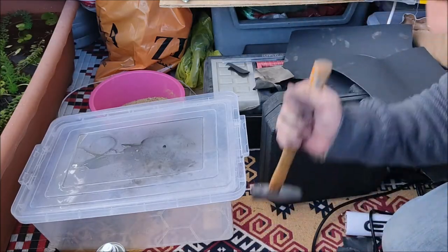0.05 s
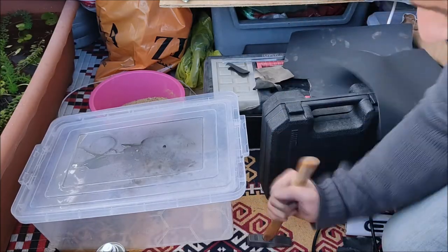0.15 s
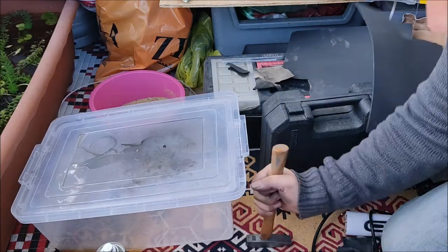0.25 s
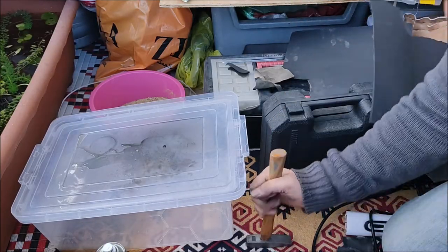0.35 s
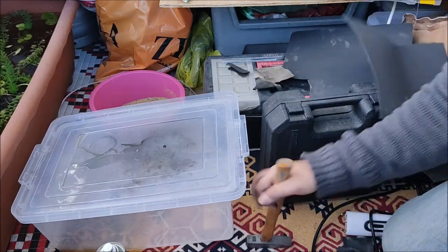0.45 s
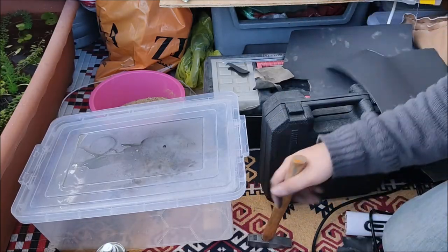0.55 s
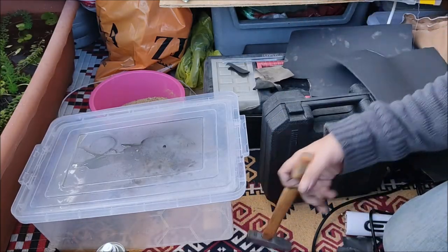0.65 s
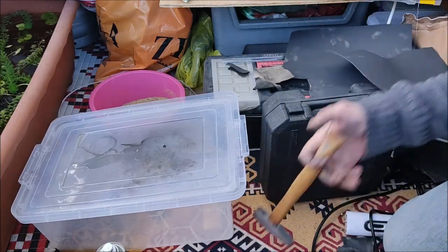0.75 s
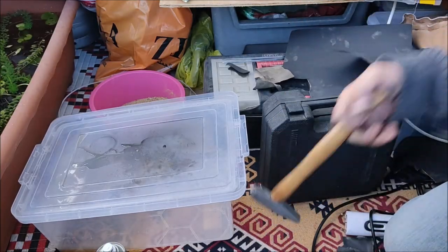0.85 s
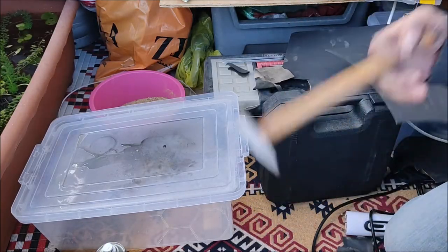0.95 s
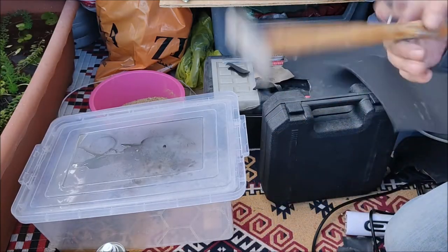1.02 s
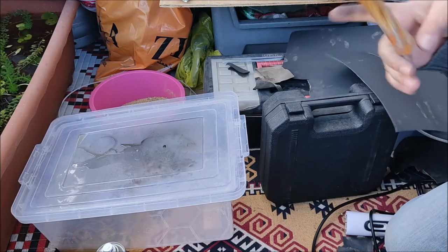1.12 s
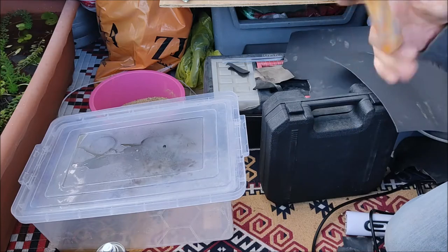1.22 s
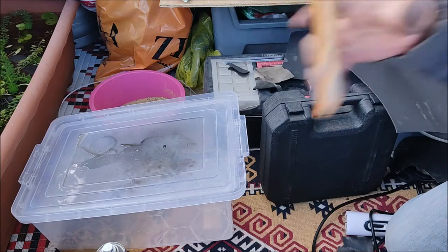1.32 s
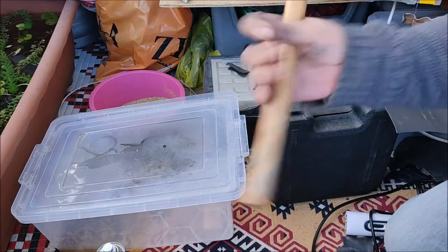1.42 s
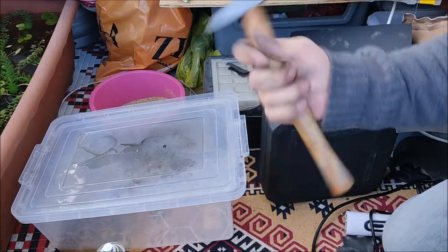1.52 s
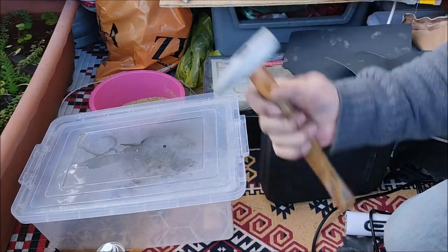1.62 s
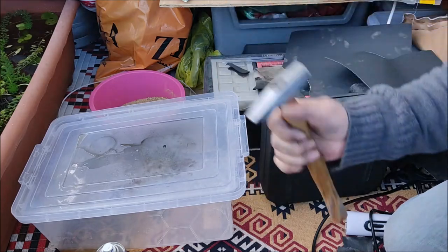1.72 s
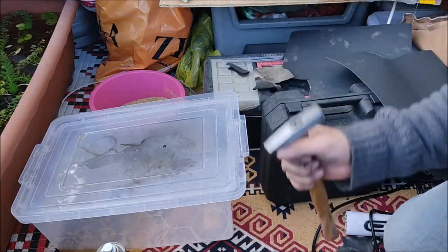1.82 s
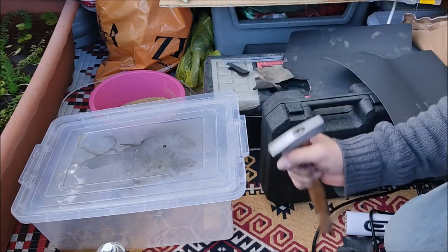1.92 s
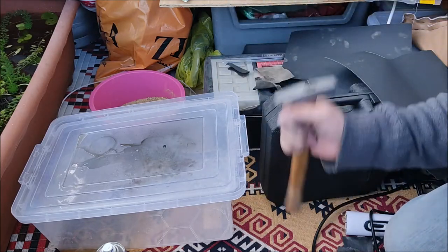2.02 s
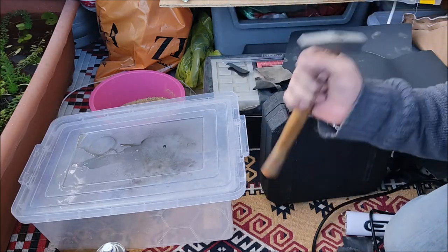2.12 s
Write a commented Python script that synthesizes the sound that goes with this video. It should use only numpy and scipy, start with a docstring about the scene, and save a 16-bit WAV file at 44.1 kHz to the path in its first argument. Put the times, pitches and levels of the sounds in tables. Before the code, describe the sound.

A small hammer hits the floor with one hard crack, followed by quiet handling.

```python
"""A small cluttered room with a rug on the floor. A small hammer is set down hard, then picked up,
tossed and caught by its handle. The blow cracks in the short modes of the head, bounces off near
surfaces and leaves the room ringing; the catch is a soft thud of handle and palm. Hand and sleeve
rub and rustle in patches of coloured noise, over quiet room tone and a low air rumble."""
import sys
import numpy as np
from scipy import signal
from scipy.io import wavfile

SR = 44100
rng = np.random.default_rng(int(sys.argv[2]) if len(sys.argv) > 2 else 0)


def generate_wav(signal):
    """Clip the signal to [-1, 1] and save it as 16-bit WAV at the path in sys.argv[1]."""
    frames = np.transpose(np.atleast_2d(signal))
    scaled = np.clip(frames, -1, 1) * 32767
    pcm = np.round(scaled).astype(np.int16)
    wavfile.write(sys.argv[1], SR, pcm)


N = 97020


def from_db(db):
    """Decibels to gain."""
    return 10 ** (np.asarray(db) / 20)


def unit_rms(x):
    """Scale to an rms of 1."""
    return x / np.sqrt(np.mean(x ** 2) + 1e-20)


def automation(rows):
    """One curve per column, ramping between the times in the first column."""
    times, *columns = np.transpose(rows)
    return [np.interp(np.arange(N) / SR, times, column) for column in columns]


def at_hz(points, hz):
    """Read a curve on a log-frequency axis."""
    freqs, values = np.transpose(points)
    return np.interp(np.log(hz), np.log(np.maximum(freqs, 1)), values)


def drift(rate_hz):
    """A smooth random wobble with a spread of 1."""
    hop, settle = 40, 2000
    pole = np.exp(-2 * np.pi * rate_hz * hop / SR)
    noise = rng.standard_normal(N // hop + settle + 2)
    slow = signal.lfilter([1], [1, -2 * pole, pole * pole], noise)[settle:]
    return np.interp(np.arange(N) / hop, np.arange(len(slow)), unit_rms(slow))


def ring(x, hz, t60):
    """One mode: a unit click sets off a dying sine of height 1."""
    decay, step = from_db(-60 / (t60 * SR)), 2 * np.pi * hz / SR
    return signal.lfilter([0, np.sin(step)], [1, -2 * decay * np.cos(step), decay * decay], x + 1e-18)


def resonate(noise, hz, width_hz):
    """Give noise a pitch by passing it twice through one resonance."""
    t60 = 2.2 / width_hz
    return ring(ring(noise, hz, t60), hz, t60)


# How alike the two channels are: freq_hz, correlation
STEREO_LIKENESS = [(40, 0.9), (130, 0.95), (300, 0.66), (700, 0.2), (1500, -0.2), (3000, 0.013),
                   (8000, 0.022)]
# Stereo balance: freq_hz, left_minus_right_db
STEREO_BALANCE = [(60, 15.5), (110, -2.5), (200, 6.5), (380, 4), (700, 4), (1290, 1), (2380, -0.5),
                  (4400, -3), (8120, -0.5), (15000, 1.5)]


def band_noise(spectrum, motion_db, size=N):
    """Stereo noise in third octaves, each with its own width, balance and level ride motion_db(hz)."""
    out, edges = 0, 35 * 2 ** np.arange(0, 9, 1 / 3)
    white = rng.standard_normal((2, 2, size))
    left_right = np.array([[1], [-1]])
    for k, (low, high) in enumerate(zip(edges, edges[1:])):
        hz = np.sqrt(low * high)
        if spectrum[0][0] <= hz <= spectrum[-1][0]:
            bandpass = signal.butter(2, [low, high], "band", fs=SR, output="sos")
            mid, side = signal.sosfilt(bandpass, white[k % 2])
            alike = np.clip(at_hz(STEREO_LIKENESS, hz), -1, 1)
            band = np.sqrt(1 + alike) * mid + np.sqrt(1 - alike) * side * left_right
            pan_db = at_hz(STEREO_BALANCE, hz) / 2 * left_right
            out = out + from_db(at_hz(spectrum, hz) + pan_db + motion_db(hz)) * band
    return out


# Colour of the room tone: freq_hz, density_db
ROOM_TONE_SPECTRUM = [(29, -42), (50, -7), (96, 0.5), (128, -18), (178, 2.5), (259, -6), (346, -9),
                      (397, -6), (762, -11.5), (920, -17.5), (1950, -29), (3000, -37.5), (3900, -55),
                      (6600, -120)]
# Its fader ride: time_s, gain_db
ROOM_TONE_RIDE = [(0, -4), (.8, -1.5), (1.3, -0.5), (1.6, 4), (2.2, 2)]


def room_tone(level_db=-53):
    """A quiet, dark bed of noise whose bands waver separately."""
    bed = unit_rms(band_noise(ROOM_TONE_SPECTRUM, lambda hz: 2.3 * drift(6.5)))
    return from_db(level_db + automation(ROOM_TONE_RIDE)[0]) * bed


# Fader ride of the air rumble: time_s, level_db
RUMBLE_RIDE = [(0, -56.5), (1.2, -58), (1.42, -46), (1.55, -48), (1.65, -44), (1.9, -41.5), (1.97, -50.5),
               (2.2, -41.5)]


def air_rumble():
    """Air on the microphone: a lumpy sub-bass, leaning left."""
    mid, side = rng.standard_normal((2, N + SR))
    air = mid + 0.17 * side * [[1], [-1]]
    rumble = unit_rms(resonate(air, hz=24.1, width_hz=3.34)[:, SR:])  # one second to settle
    return from_db(automation(RUMBLE_RIDE)[0] + [[2.5], [-2.5]]) * rumble


# Fader rides of the three rubbing layers: time_s, scrape_db, hiss_db, ring_db
RUB_RIDES = [(0, -45.5, -50, -71), (.04, -47, -52, -59), (.09, -52.5, -56.5, -79), (.115, -51.5, -47, -68),
             (.165, -51, -51, -75), (.195, -46.5, -42.5, -78), (.24, -46, -44.5, -99), (.44, -51, -59, -54),
             (.49, -44.5, -47.5, -54), (.557, -53.5, -58, -50.5), (.565, -50, -42, -51),
             (.61, -46, -55, -50), (.645, -42, -44, -98), (.75, -56, -57.5, -61), (.833, -51.5, -53.5, -59),
             (.845, -45.5, -49, -56), (.92, -45.5, -54.5, -50.5), (.99, -50.5, -58.5, -55.5),
             (1.06, -58.5, -60.5, -79), (1.08, -83, -45, -64), (1.11, -44.5, -40.5, -70),
             (1.2, -52.5, -50, -92), (1.29, -57, -60.5, -80), (1.325, -69, -61.5, -94),
             (1.395, -87, -60.5, -83), (1.42, -79.5, -50.5, -84), (1.49, -64, -45, -79),
             (1.525, -61, -38.5, -83), (1.58, -62, -47, -75), (1.62, -61, -35.5, -81),
             (1.7, -59, -56.5, -82), (1.77, -63.5, -49, -91), (1.83, -66, -52.5, -75),
             (1.9, -62, -50.5, -95), (2.2, -64.5, -54.5, -74)]
# Colour of the low scrape: freq_hz, density_db
SCRAPE_SPECTRUM = [(88, -115), (150, -10.5), (246, -10), (415, -19), (540, -15), (702, -12.5), (1800, -8.5),
                   (3610, -18.5), (6000, -18.5), (7800, -20), (13200, -120)]
# Colour of the bright hiss: freq_hz, density_db
HISS_SPECTRUM = [(1500, -36), (2000, -21), (2300, -11), (5000, -9.5), (6500, -7.5), (7800, 4.5), (9000, -6),
                 (10500, -16), (13000, 0), (15500, -30)]


def rubbing():
    """Hand and sleeve rub: a rough low scrape, a faint ring and a patchy bright hiss."""
    scrape_db, hiss_db, ring_db = automation(RUB_RIDES)
    scrape = unit_rms(band_noise(SCRAPE_SPECTRUM, lambda hz: drift(54)))
    tone = unit_rms(resonate(rng.standard_normal((2, N)), hz=1820, width_hz=90))
    hiss = unit_rms(band_noise(HISS_SPECTRUM, lambda hz: 1.6 * drift(2.2)))
    scrape *= from_db(scrape_db + 0.58 * drift(40))
    hiss *= from_db(hiss_db + 1.3 * drift(33))
    return scrape + from_db(ring_db) * tone + hiss


def strike(modes, scatter_db=0):
    """A click into modes of alternating polarity, with optional random scatter in their levels."""
    click = signal.unit_impulse(SR // 2)
    out = 0
    for k, (hz, db, t60) in enumerate(modes):
        if scatter_db:
            db += scatter_db * rng.standard_normal()
        out = out + (-1) ** k * from_db(db) * ring(click, hz, t60)
    return out


# Modes of the hammer head: pitch_hz, level_db, t60_s
HEAD_MODES = [(390, -11, .05), (1000, -3, .012), (1300, -1, .011), (1750, -1, .011), (3200, -4, .006),
              (4800, -2, .007), (7600, -16, .07), (13500, -7, .006)]


def head_crack():
    """The struck head rings very briefly: a hard crack, lows trimmed, peaking at 1."""
    crack = signal.lfilter(*signal.butter(2, 250, "high", fs=SR), strike(HEAD_MODES))
    return crack / np.abs(crack).max()


def contact_snap(centre_hz, t60=.009):
    """First contact spits out a tiny burst of band-passed noise."""
    t = np.arange(SR // 10) / SR
    burst = rng.standard_normal((2, len(t))) * from_db(-60 * t / t60)
    band_hz = [centre_hz / 2, min(2 * centre_hz, .45 * SR)]
    return signal.lfilter(*signal.butter(1, band_hz, "band", fs=SR), burst)


# Modes of handle and palm: pitch_hz, level_db, t60_s
HANDLE_MODES = [(185, -6, .19), (260, -4, .33), (352, 0, .22), (378, -4, .18), (427, -2, .18), (535, 1, .2),
                (738, -8, .2), (916, -12, .15), (1217, -9, .05)]


def handle_thud():
    """Handle and palm give a muffled knock, coloured a little differently each time."""
    return -signal.lfilter(*signal.butter(1, 1500, fs=SR), strike(HANDLE_MODES, scatter_db=2))


# Colour of the diffuse reverb: freq_hz, density_db
REVERB_SPECTRUM = [(24, -59), (40, -46), (81, -17), (150, -30), (197, -15.5), (298, -7.5), (391, -4),
                   (499, -14), (670, -0.5), (945, -2.5), (1270, -4.5), (1700, -6.5), (7590, -22),
                   (14000, -35)]
# How long it rings: freq_hz, t60_s
REVERB_DECAY = [(100, 0.53), (260, 0.4), (700, .29), (1840, 0.35), (4850, 0.21), (9000, 0.31)]
# How fast the room blooms: freq_hz, time_constant_s
REVERB_ATTACK = [(60, 0.013), (300, 0.0064), (800, 0.0063), (2000, 0.0055), (8000, 0.00033)]
# Standing waves of the room: pitch_hz, level_db, t60_s
ROOM_MODES = [(205, -13, .5), (279, -14, .35), (389, -7, .31), (445, -12, .3), (598, -10, .3),
              (684, 0, .25), (748, -8, .25), (845, -4, .26), (921, -1, .35), (1076, -5, .28),
              (1396, -12, .29), (1727, -10, .3)]


def room_reverb(modes_db=-2):
    """Diffuse noise dying band by band, plus standing waves; the lows bloom later."""
    t = np.arange(SR // 2) / SR
    bloom = lambda hz: (1 - np.exp(-(t + 1e-6) / at_hz(REVERB_ATTACK, hz))) ** 2
    envelope_db = lambda hz: 20 * np.log10(bloom(hz)) - 60 * t / at_hz(REVERB_DECAY, hz)
    tail = band_noise(REVERB_SPECTRUM, envelope_db, size=len(t))
    tail /= np.sqrt(np.mean(tail[:, :SR // 10] ** 2))  # rms 1 over the first 0.1 s
    for hz, db, t60 in ROOM_MODES:
        cycles = hz * t + rng.random() + 0.08 * rng.standard_normal((2, 1))
        tail += bloom(hz) * from_db(modes_db + db - 60 * t / t60) * np.sin(2 * np.pi * cycles)
    return tail


# Hammer contacts, the first only a faint low swell of movement just before the blow; the crossover splits the
# reverb into lows and highs: start_s, crack_db, crossover_hz, reverb_low_db, reverb_high_db, thud_db, snap_db,
# snap_centre_hz
CONTACTS = [(.178, -60, 259, -36, -55.5, -49.5, -60, 4000), (0.2224, -2, 1300, -18.5, -22, -23, -16, 6000),
            (0.561, -45, 1000, -44, -50, -52, -38, 6000), (1.0855, -46, 544, -41, -42, -28.5, -23, 14000),
            (1.317, -60, 900, -60, -53, -60, -55, 2000), (1.949, -40, 900, -45, -62, -50, -50, 1500)]
# Early reflections off near surfaces: delay_s, left_db, right_db
REFLECTIONS = [(.0028, -4, -21), (.0045, -22, -9), (0.0125, -12, -10)]


def hammer_knocks(crack_lag_s=.0004, right_lag_s=.00005, palm_lag_s=.0022):
    """Each contact layers the head's crack and its reflections, a snap, a thud and the room."""
    out = np.zeros((2, N + SR))

    def place(track, start_s, sound):
        i = int(start_s * SR)
        track[..., i:i + sound.shape[-1]] += sound

    crack, direct_path = head_crack(), (0, -3, 1)
    first_reverb, second_reverb = room_reverb(), room_reverb()
    for start_s, crack_db, crossover_hz, low_db, high_db, thud_db, snap_db, snap_hz in CONTACTS:
        for delay_s, left_db, right_db in [direct_path] + REFLECTIONS:
            arrival_s = start_s + crack_lag_s + delay_s
            place(out[0], arrival_s, from_db(crack_db + left_db) * crack)
            place(out[1], arrival_s + right_lag_s, from_db(crack_db + right_db) * crack)
        place(out, start_s, from_db(snap_db) * contact_snap(snap_hz))
        thud = from_db([[thud_db - 6], [thud_db - 10.5]]) * handle_thud()
        place(out, start_s + palm_lag_s, thud)  # the palm closes just after first contact
        reverb = first_reverb if crack_db >= -20 else second_reverb  # the hard blow uses one draw of the room, the softer contacts another
        lows = signal.lfilter(*signal.butter(2, crossover_hz, fs=SR), reverb)
        place(out, start_s, from_db(low_db) * lows + from_db(high_db) * (reverb - lows))
    return out[:, :N]


# Swishes of hand and sleeve: middle_s, half_length_s, centre_hz, width_hz, level_db
SLEEVE_SWISHES = [(.642, .03, 3950, 200, -52), (.642, .035, 4900, 300, -52), (.87, .06, 3950, 150, -63),
                  (.868, .06, 4950, 500, -53), (.87, .05, 6900, 600, -53), (.6, .05, 195, 50, -49),
                  (.578, .025, 870, 60, -50), (.985, .04, 800, 300, -53), (1.335, .05, 1500, 900, -56),
                  (1.525, .05, 2300, 300, -58), (1.625, .04, 2300, 300, -54), (1.46, .12, 12000, 3000, -52),
                  (1.84, .1, 2700, 250, -60), (1.84, .1, 5900, 300, -61)]


def sleeve_swishes():
    """Hand and sleeve move: brief, smooth swells of resonant noise."""
    out = np.zeros((2, N))
    for middle_s, half_length_s, hz, width_hz, db in SLEEVE_SWISHES:
        i, size = int((middle_s - half_length_s) * SR), int(2 * half_length_s * SR)
        noise = rng.standard_normal((2, SR // 2))[:, :size]
        out[:, i:i + size] += from_db(db) * np.hanning(size) * unit_rms(resonate(noise, hz, width_hz))
    return out


def scene():
    """Hammer and handling noises over the room's quiet bed."""
    return hammer_knocks() + rubbing() + sleeve_swishes() + room_tone() + air_rumble()


def record(dry):
    """The microphone steps down above its treble edge; peaks are rounded and the very top is cut."""
    edge_hz, treble_db, ceiling, cutoff_hz = 9400, -19, 1.3, 16400
    body = signal.sosfilt(signal.butter(10, edge_hz, fs=SR, output="sos"), dry)
    treble = signal.sosfilt(signal.butter(10, edge_hz, "high", fs=SR, output="sos"), dry)
    rounded = ceiling * np.tanh((body - from_db(treble_db) * treble) / ceiling)
    return signal.sosfilt(signal.cheby2(12, 70, cutoff_hz, fs=SR, output="sos"), rounded)


dry = scene()
out = record(dry)
generate_wav(out)
```